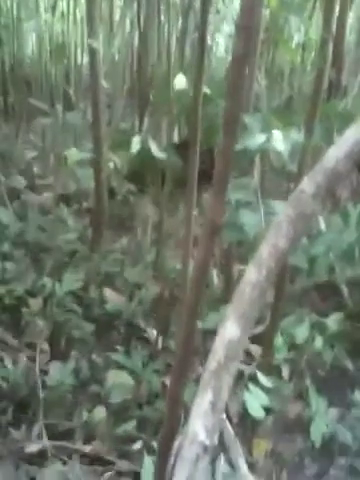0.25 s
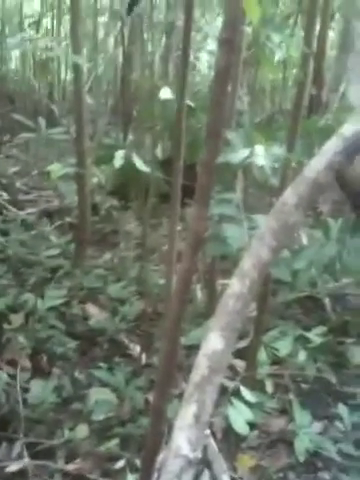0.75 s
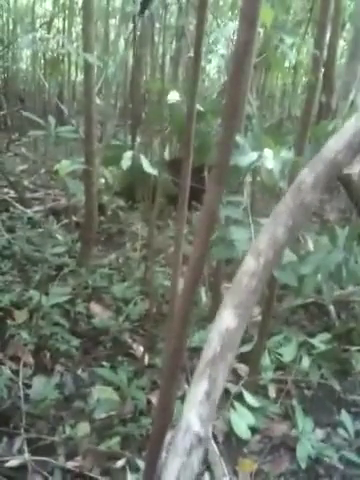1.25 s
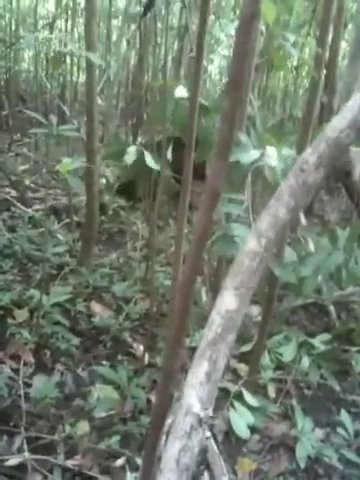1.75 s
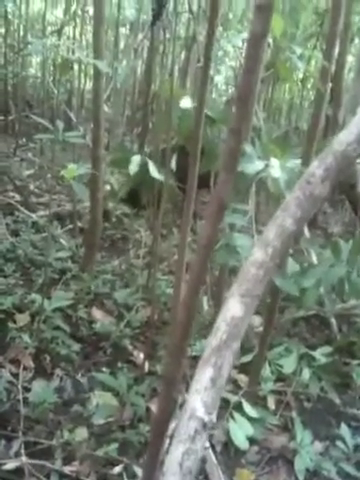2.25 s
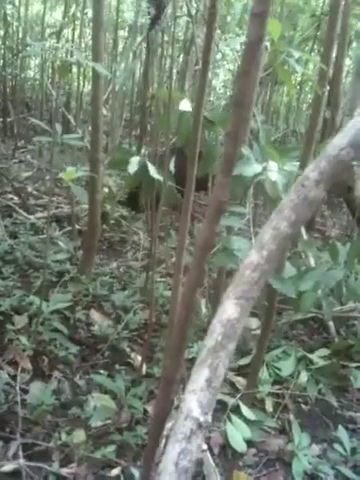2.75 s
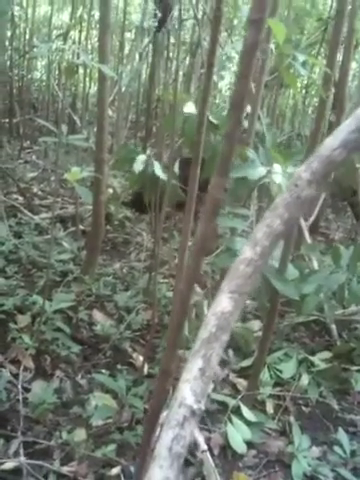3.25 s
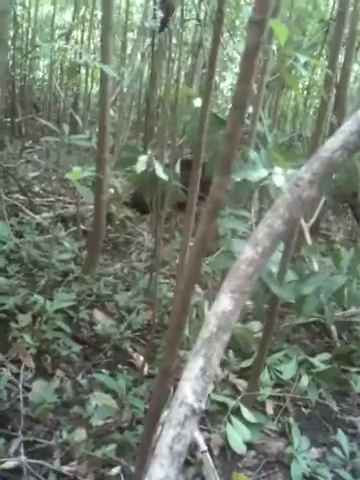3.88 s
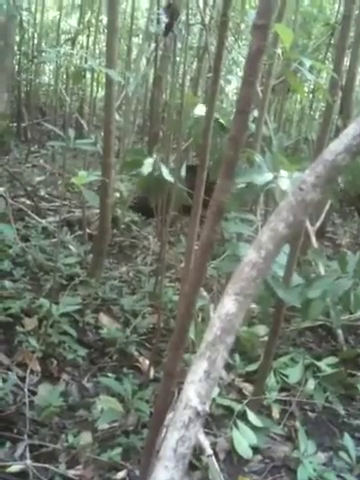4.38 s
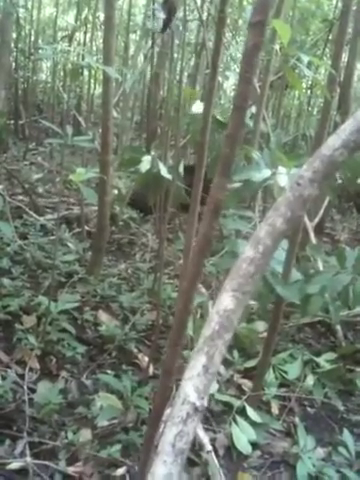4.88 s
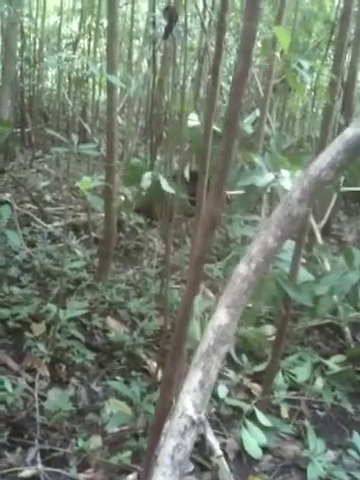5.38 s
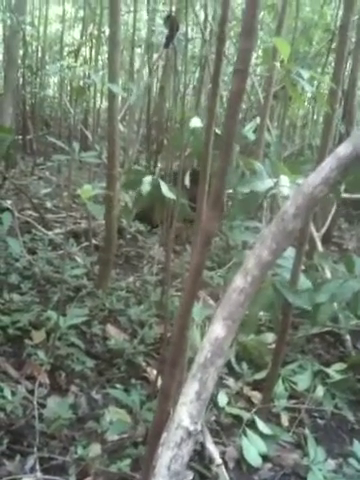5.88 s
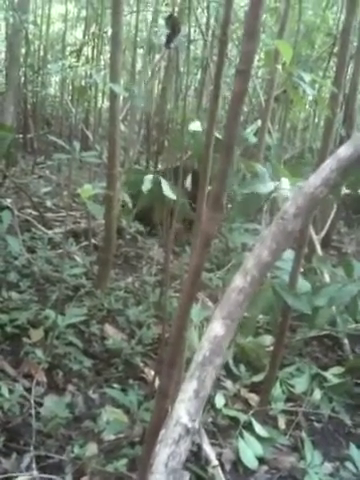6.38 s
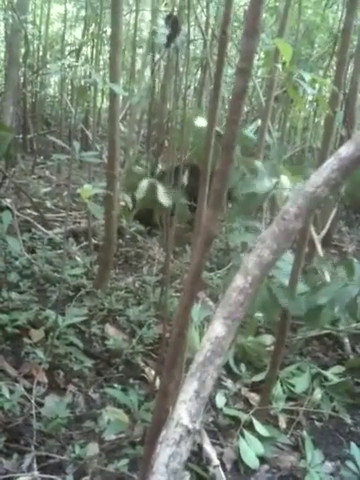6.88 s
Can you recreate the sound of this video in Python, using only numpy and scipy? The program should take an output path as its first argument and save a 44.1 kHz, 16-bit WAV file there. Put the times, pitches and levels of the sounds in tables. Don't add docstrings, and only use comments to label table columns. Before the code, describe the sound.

A boar snorts behind undergrowth: first a leafy shuffle, then a run of harsh, rattling grunts about four a second, slower grunts mixed with nasal whistling gasps, and a final quick run overlapped by high wavering bird notes. Leaf snaps and small twig cracks scatter throughout. Outdoor mono pickup from several metres, thin in the bass, with soft woodland reverberation.

```python
import sys
import numpy as np
from scipy import signal
from scipy.fft import rfft, irfft, next_fast_len
from scipy.io import wavfile
from scipy.ndimage import uniform_filter1d, map_coordinates

SR = 44100
rng = np.random.default_rng(int(sys.argv[2]) if len(sys.argv) > 2 else 0)


def level_to_linear(level):
    exponent = np.asarray(level, float) / 20
    return 10 ** exponent


def inscribe(sig):
    pcm = np.round(np.clip(np.atleast_2d(sig).T, -1, 1) * 32767)
    wavfile.write(sys.argv[1], SR, pcm.astype(np.int16))


N = 314433


def unit(x):
    return x / np.sqrt(np.mean(x ** 2) + 1e-20)


def along(points, hz):
    f, v = np.transpose(points)
    return np.interp(np.log(hz + 1), np.log(f + 1), v)


def curves(rows):
    s, *columns = np.transpose(rows)
    return [np.interp(np.arange(N) / SR, s, c) for c in columns]


def during(rows, fade_s):
    t = np.arange(N) / SR
    rise = t - rows[0][0] + fade_s
    fall = rows[-1][0] + fade_s - t
    return np.clip(np.minimum(rise, fall) / fade_s, 0, 1)


def wobble(rate):
    knots = rng.standard_normal(int(N * rate / SR) + 4)
    return map_coordinates(knots, [np.arange(N) * rate / SR])


def filtered(x, response):
    m = next_fast_len(N + SR // 2)
    return irfft(rfft(x, m) * response(np.fft.rfftfreq(m, 1 / SR)), m)[..., :N]


def band(x, lo_hz, hi_hz):
    return signal.sosfilt(signal.butter(2, [lo_hz, hi_hz], "band", fs=SR, output="sos"), x)


def noise(spectrum, lumpy_db, rate):
    fluttering = rng.standard_normal(N) * level_to_linear(lumpy_db * wobble(rate))
    return unit(filtered(fluttering, lambda hz: level_to_linear(along(spectrum, hz))))


def patchy(x, depth_db):
    z = signal.stft(x, nperseg=256)[2]
    field = uniform_filter1d(rng.standard_normal(z.shape), size=6, axis=0)
    field = uniform_filter1d(field, size=12, axis=1)
    return unit(signal.istft(z * level_to_linear(depth_db * unit(field)), nperseg=256)[1][:N])


def notes(rows, shape):
    peak_at, rise_db, fall_db, glide_done = shape
    strands = []
    for s, length, first, last, db in rows:
        start = (s, first, db - rise_db)
        peak = (s + peak_at * length, first + glide_done * (last - first), db)
        strands.append([start, peak, (s + length, last, db - fall_db)])
    return strands


def tones(strands, gain_db, waver, trill_db, fade_s, trill_rate):
    out = np.zeros(N)
    bend = 1 + waver * wobble(110)
    trill = trill_db * wobble(trill_rate)
    for strand in strands:
        hz, db = curves(strand)
        whistle = np.sin(2 * np.pi * np.cumsum(hz * bend) / SR)
        out += level_to_linear(db + gain_db + trill) * during(strand, fade_s) * whistle
    return out


# [pitch_hz, level_db per Hz]
FOREST = [(24, -83), (40, -51), (106, -15), (124, -11), (159, -14), (189, -11.5), (466, -11.5), (502, -7),
          (569, -14.5), (2620, -24), (2830, -23), (3050, -24.5), (3370, -26.5), (7710, -24), (15900, -33)]


def hush():
    drift_db = .8 * wobble(3)
    return level_to_linear(-62.5 + drift_db) * noise(FOREST, 0.23, 28)


# [pitch_hz, t60_s]
TRUNKS = [(200, 0.17), (1500, 0.35), (5000, 0.68), (12000, 0.54)]


def trunks(x):
    tails = 3
    out, turn = np.zeros(N), (np.arange(N) // (SR // 5)) % tails
    for k in range(tails):
        hz, t, z = signal.stft(rng.standard_normal(SR // 2), SR, nperseg=256)
        decay = level_to_linear(-60 * t / along(TRUNKS, hz)[:, None])
        tail = signal.istft(z * decay, SR, nperseg=256)[1]
        part = x * uniform_filter1d(1. * (turn == k), size=2000)
        out += signal.fftconvolve(np.pad(part, (500, 0)), tail / np.linalg.norm(tail))[:N]
    return out


# [start_s, length_s, first_hz, last_hz, peak_db]
BIRD = [(.91, 0.14, 3180, 3120, -78), (5.65, .17, 2994, 3050, -58), (5.93, 0.12, 2820, 2727, -49.5),
        (6.13, 0.133, 3080, 3000, -63), (6.405, 0.062, 1946, 2320, -54.5), (6.625, 0.086, 2517, 2970, -47),
        (6.845, 0.042, 2194, 2420, -55.5), (6.885, 0.052, 2750, 2690, -48), (6.95, 0.091, 2400, 2400, -57),
        (7.078, 0.042, 3470, 3290, -50), (7.1, 0.032, 3160, 2690, -51)]
# [peak_at share of length, start_db under peak, end_db under peak, glide_done share by the peak]
BIRD_SHAPE = (0.49, 3.5, 7.7, 0.89)


def bird():
    return tones(notes(BIRD, BIRD_SHAPE), 3.3, waver=.009, trill_db=6, fade_s=0.0087, trill_rate=75)


# [time_s, crackle_db, scuff_db relative]
RUSTLE = [
    (0.0, -47, -16),
    (0.072, -55, -19),
    (0.108, -57, -4.5),
    (0.282, -51.5, -5.5),
    (0.372, -62.5, -8),
    (0.51, -53.5, -10.5),
    (0.73, -68, -13),
    (0.75, -73, -6),
]
# [pitch_hz, level_db per Hz]
LEAVES = [(1180, -28), (2000, -8.5), (2200, -18), (2570, -5), (3740, -8.5), (8100, -2), (12700, -9),
          (15900, -14.5)]
SCUFF = [(88, -37), (150, -8), (640, 7), (2210, -4.5), (2400, -18), (3120, -34), (5280, -120)]


def shuffle():
    crackle_db, scuff_db = curves(RUSTLE)
    litter = noise(LEAVES, 2.5, 400) + level_to_linear(scuff_db) * noise(SCUFF, 3.1, 58.0)
    return level_to_linear(crackle_db) * during(RUSTLE, 0.054) * litter


# [time_s, peak_db, after_crackle_db relative, t60_s]
TICKS = [(0.057, -41, -17, 0.1), (0.2517, -31.5, -5, 0.095), (0.4568, -35.5, -11.5, 0.048),
         (0.4901, -32, -8, 0.077), (3.09, -50, -1, 1), (3.7763, -43.5, -8.5, 0.1),
         (3.9008, -35.5, -12.5, 0.11), (4.017, -38, -6.5, 0.16), (4.1775, -43, -6, 0.48),
         (4.6261, -35, -12.5, 0.14), (4.9327, -37.5, -13.5, 0.1), (5.4645, -35, -7.5, 0.13),
         (5.6348, -34.5, -13, 0.42), (6.4326, -37, -7.5, 0.21), (6.594, -37.5, -6, 0.47),
         (6.83, -48, -1, .6), (7.0, -51.5, -2.5, 0.91)]
# [time_s, peak_db, ring_hz]
TWIGS = [
    (0.2835, -38.5, 2660),
    (.575, -47, 220),
    (3.293, -34, 2640),
    (3.2935, -42, 3150),
    (4.054, -37, 1250),
    (4.055, -46, 600),
    (4.46, -47, 160),
]


def snaps():
    snap, after, t = np.zeros(N + SR), np.zeros(N + SR), np.arange(SR // 4) / SR
    for s, db, after_db, t60 in TICKS:
        at = round(s * SR) + 40
        snap[at] = level_to_linear(db + 14.0)
        after[at:][:len(t)] += level_to_linear(db - 29.5 - 60 * t / 0.0022) + level_to_linear(db + after_db - 2.0 - 60 * t / t60)
    for s, db, hz in TWIGS:
        for lag, pitch in ((0, 1.06), (.0025, .93), (.012, 1.15)):
            ring = level_to_linear(db - 950 * lag - 60 * t / 0.026) * np.sin(2 * np.pi * hz * pitch * t)
            snap[round((s + lag) * SR):][:len(t)] += ring
    return band(snap[:N], 1900, 11000) + after[:N] * noise(LEAVES, 2.3, 500)


# [start_s, length_s, first_hz, last_hz, peak_db]
WHEEZE = [
    (.1, .09, 1350, 1336, -53),
    (3.89, 0.12, 943, 1002, -52.5),
    (3.9, .08, 1706, 1645, -59),
    (4.4, 0.062, 2265, 2150, -52.5),
    (4.54, .09, 2290, 2150, -68),
    (4.41, 0.063, 1610, 1520, -57),
    (4.78, 0.13, 972, 1008, -51),
    (5.0, 0.078, 1032, 1012, -61),
    (5.43, 0.16, 904, 959, -53),
    (5.44, .16, 1670, 1660, -55),
]
# [peak_at share of length, start_db under peak, end_db under peak, glide_done share by the peak]
WHEEZE_SHAPE = (0.21, 1.2, 10.5, 0.46)


def wheeze():
    return tones(notes(WHEEZE, WHEEZE_SHAPE), 3.3, waver=.022, trill_db=5, fade_s=0.015, trill_rate=130)


# [pitch_hz, level_db per Hz]
SNOUT = [(1760, -2), (3000, -6.5), (3500, -13), (4690, -8.5), (5140, -3.5), (7340, -7.5), (8090, -8),
         (12800, -15.5), (15900, -19.5)]


def snout_hiss(flutter):
    hiss = flutter ** 0.11 * patchy(noise(SNOUT, 0.77, 300), 3)
    return hiss, unit(band(hiss, 7350, 12800))


def valve(times):
    marks, lag = np.zeros(N), np.arange(-SR // 40, SR // 40 + 1) / SR
    marks[(np.array(times) * SR).astype(int) + 40] = 1
    shut = -.75 * np.exp(-(lag / .007) ** 4)
    burst = .5 * np.exp(-abs(lag) / .006)
    shape = np.where(lag < 0, shut, burst)
    return np.clip(1 + signal.fftconvolve(marks, shape, "same"), .1, 3)


# [time_s, peak_db, mouth_db relative]
FLAPS = [(1.437, -19, -18), (1.492, -13, -16), (1.862, -26, -10), (1.89, -24.5, -2), (2.065, -27, -14),
         (2.108, -30, -3), (2.128, -21.5, -4), (2.492, -20, -1.5), (2.504, -20.5, 7), (2.536, -16.5, 3.5),
         (2.742, -19, 3.5), (2.761, -16, 1.5), (2.796, -28, -13), (2.972, -17, -2), (2.99, -19, -3.5),
         (3.205, -23, -23), (3.774, -21.5, -16), (3.819, -27, -3), (4.263, -22, -13), (4.339, -21.5, -8),
         (4.73, -33, -11), (5.359, -23.5, -7), (5.804, -18.5, -7.5), (5.835, -22.5, -9), (5.868, -27.5, 6),
         (6.074, -20, -12), (6.294, -12.5, -15), (6.528, -22, -13), (6.694, -18.5, -15), (6.741, -16, -2)]


def airflow(flutter):
    scatter_db = 2.2 * rng.standard_normal(N)
    small = unit((rng.random(N) < 120 / SR) * level_to_linear(scatter_db))
    flow = valve([f[0] for f in FLAPS])
    return [(0.77 * small + 0.75 * unit(flutter * rng.standard_normal(N))) * flow for _ in range(2)]


# [start_s, swell_s, hold_s, throat_db, hiss_db relative]
GRUNTS = [(0.073, .001, 0.11, -60, 0), (1.276, 0.046, 0.094, -37.5, -10.5),
          (1.422, 0.029, 0.043, -30, -6.5), (1.59, .004, .002, -43, -26), (1.646, 0.03, .002, -40, 0),
          (1.837, .002, 0.057, -40, -5), (2.044, 0.023, 0.041, -34, -9.5), (2.297, 0.038, .002, -33, -8),
          (2.488, 0.026, 0.023, -33.5, -4.5), (2.718, 0.052, .002, -32, -5.5),
          (2.949, 0.022, 0.049, -30.5, -11), (3.19, 0.026, 0.031, -33.5, -14),
          (3.444, 0.0024, 0.074, -37.5, -14), (3.77, .02, 0.04, -38.5, -14.5),
          (4.213, 0.026, 0.096, -35.5, -12.5), (4.389, .002, 0.23, -60.5, -11),
          (4.663, 0.046, 0.015, -39.5, -13), (5.283, 0.0025, 0.084, -39.5, -17),
          (5.787, 0.0026, 0.087, -40, -9.5), (6.024, 0.054, 0.0031, -34.5, -5),
          (6.256, 0.043, 0.012, -33, -4), (6.472, 0.0037, 0.041, -41, -5.5),
          (6.677, 0.01, 0.036, -33, -6.5), (6.9, 0.012, 0.0023, -36, -6)]


def strong_flaps():
    pulses = np.zeros((2, N))
    pops = [(g[0] + .008, g[3] + 4, -26) for g in GRUNTS]
    for s, db, mouth_db in FLAPS + pops:
        pulses[:, round(s * SR) + 40] = -level_to_linear(1.5) * level_to_linear([db + 6.5, db + mouth_db + 8.0])
    return pulses


OPEN_S, RELEASE_S = .012, 0.1


def push(t, swell, hold, db, moves, slow):
    open_db, fade_s = 9, .008
    up, sag, fall = moves
    times = np.cumsum([0, OPEN_S, swell, hold, RELEASE_S])
    steps_db = [-open_db, open_db, up * swell, -sag * hold, -slow * fall * RELEASE_S]
    levels = np.cumsum(steps_db) - up * swell
    fade = np.clip(np.minimum(t + fade_s, times[-1] + fade_s - t) / fade_s, 0, 1)
    return level_to_linear(db + np.interp(t, times, levels)) * fade


def cavities(x, modes, damp_hz, zero_hz):
    f = np.fft.rfftfreq(len(x), 1 / SR)

    def peak(c, w):
        return 1j * f * w / (c * c - f * f + 1j * f * w)

    response = sum(level_to_linear(db) * peak(c, w) * peak(c, damp_hz) for c, w, db in modes)
    response = response * (1 - (1 - level_to_linear(-8)) * peak(zero_hz, 300))
    return irfft(rfft(x) * response / np.sqrt(np.mean(abs(response) ** 2)), len(x))


# [throat_hz, mouth_hz, mouth_db relative, nose_db relative, chest_db relative]
TRACT = [(520, 1300, -3.5, 2, -11), (693, 1250, -5.5, 1.5, -9), (596, 1524, -1.5, -9, -9),
         (485, 1210, -2, -6, -9), (630, 1770, -1.5, 0, 0.5), (663, 1430, 1, -4, -2),
         (507, 1540, -2.5, -3.5, -3), (560, 1520, -1.5, -3, -6.5), (538, 1570, 1.5, -7.5, -8),
         (530, 1590, 1, -52, -6.5), (540, 1540, 0, -2.5, -7.5), (593, 1260, -7.5, -34, -4.5),
         (540, 1640, -10, 1, -8.5), (544, 1810, -4, -11, -9.5), (533, 1425, -7.5, -7, -8),
         (430, 1560, 5, -15, 2), (538, 1500, -10, -3, -8.5), (530, 1800, -4.5, -12, -9.5),
         (704, 1594, 0.5, 5, -7.5), (630, 1613, -0.5, -31, -6), (607, 1600, -5.5, -14, 0),
         (710, 1420, 0.5, -5.5, -5.5), (735, 1410, -1, -7, -5.5), (710, 1404, -2.5, -7, -2.5)]
# [start_s, swell_s, hold_s, throat_db, hiss_db relative]
GASPS = [
    (3.869, .002, 0.13, -45.5, -14),
    (4.751, .002, 0.093, -48.5, -16),
    (4.985, 0.014, .002, -60, -28),
    (5.398, 0.03, 0.13, -38.5, -18.5),
]
# [throat_hz, mouth_hz, mouth_db relative, nose_db relative, chest_db relative]
GASP_TRACT = (522, 1704, -8, 7, -9.5)
# [pitch_hz, width_hz, level_db]
UPPER = [(2783, 56, -10), (3230, 250, -17.5)]


def boar():
    # swell, sag in the hold, fall, in dB per s
    throat_moves, mouth_moves, hiss_moves = (152, 47, 620), (210, 50, 870), (217, -49.5, 290)
    flutter = level_to_linear(4 * wobble(60))
    throat_air, mouth_air = airflow(flutter)
    hiss, edge = snout_hiss(flutter)
    flaps, voice = strong_flaps(), np.zeros(N)
    breaths = [(g, tract, 1) for g, tract in zip(GRUNTS, TRACT)]
    breaths += [(g, GASP_TRACT, 0.21) for g in GASPS]
    for (s, swell, hold, db, hiss_db), tract, slow in breaths:
        throat_hz, mouth_hz, mouth_db, nose_db, chest_db = tract
        t = np.arange(round((swell + hold + RELEASE_S + .13) * SR)) / SR - .02
        first = round((s - .02) * SR)
        near = slice(first, first + len(t))
        own = (t > -.005) & (t < OPEN_S + swell + hold + .01)

        nose_hz = 797 + 7.9 * max(nose_db, -10)
        zero_hz = 1.406 * nose_hz
        palate_db = min(0.84 * (-50 - db - mouth_db), 5)
        side_db = -5 + 0.35 * palate_db
        low = [(throat_hz, 130, 0), (nose_hz, 120, nose_db)]
        low += [(190, 110, chest_db + max(nose_db, 0)), (380, 120, -7)]
        high = [(mouth_hz, 170, 0), (1.198 * mouth_hz, 150, -5)]
        high += [(2386, 150, palate_db), (1250, 90, side_db)] + UPPER

        throat = push(t, swell, hold, db - 3, throat_moves, slow) * throat_air[near]
        mouth = push(t, swell, hold, db + mouth_db - 4, mouth_moves, slow) * mouth_air[near]
        voice[near] += cavities(throat + own * flaps[0, near], low, 460, zero_hz)
        voice[near] += cavities(mouth + own * flaps[1, near], high, 280, zero_hz)
        snout_db = db + hiss_db
        fizz = level_to_linear(-8.5 + 0.61 * (snout_db + 35.5)) * edge[near]
        voice[near] += push(t - 0.0058, swell, hold, snout_db, hiss_moves, slow) * (hiss[near] + fizz)
    return band(voice, 137, 20000) + wheeze()


def ground(x):
    delay_s, echo_db = 0.000475, -11.5
    return 0.97 * filtered(x, lambda hz: 1 + level_to_linear(echo_db) * np.exp(-2j * np.pi * hz * delay_s - hz / 6000))


def scene():
    pig, song, litter = ground(boar()), bird(), shuffle() + snaps()
    echo = trunks(level_to_linear(-8) * pig + level_to_linear(-4) * song + level_to_linear(-9.5) * litter)
    return (pig + song + litter + echo + hush())[None]


def roll_off(x):
    return signal.sosfilt(signal.butter(12, 16090, fs=SR, output="sos"), x)


def record(dry):
    mic = signal.sosfilt(signal.butter(3, 80, "high", fs=SR, output="sos"), dry)
    mix = filtered(mic, lambda hz: hz < 15830)
    return roll_off(mix)


dry = scene()
out = record(dry)
inscribe(out)
```